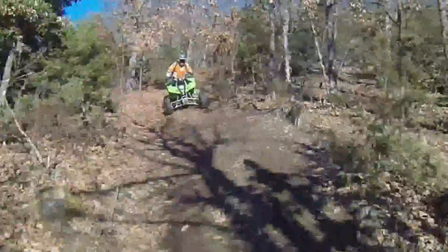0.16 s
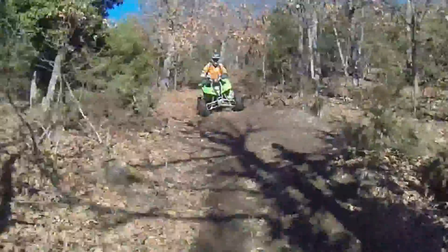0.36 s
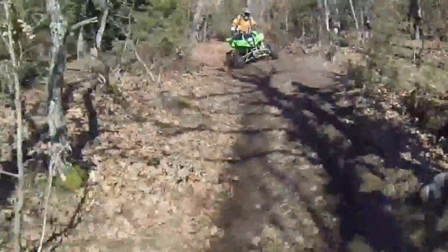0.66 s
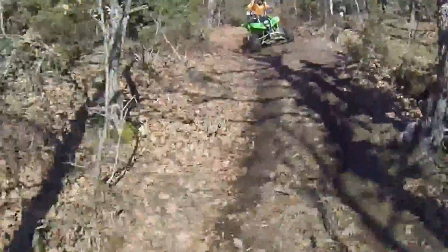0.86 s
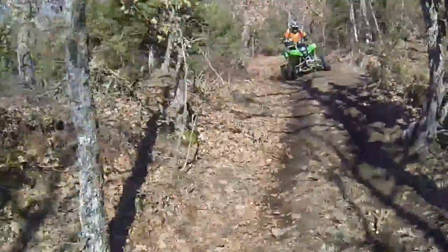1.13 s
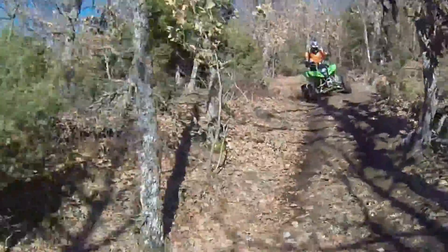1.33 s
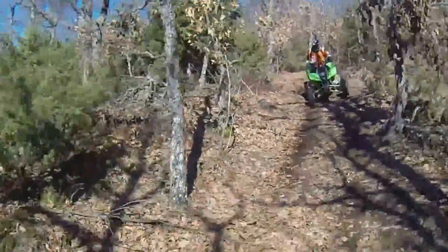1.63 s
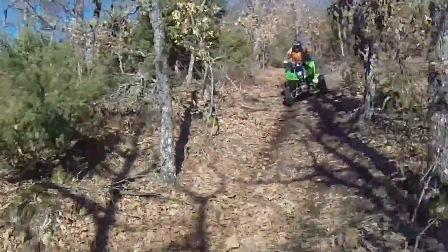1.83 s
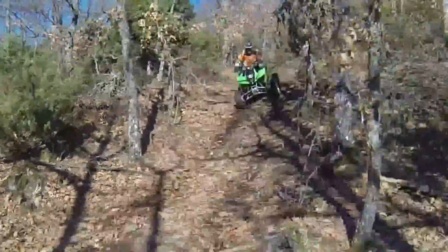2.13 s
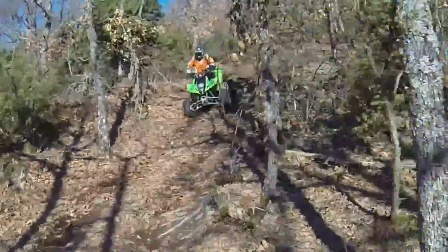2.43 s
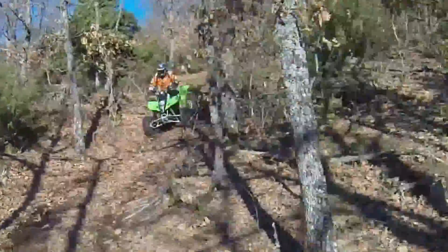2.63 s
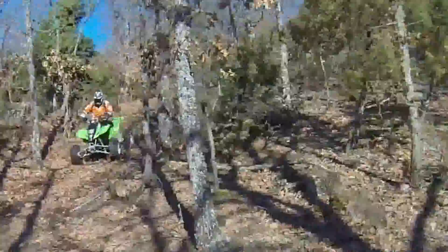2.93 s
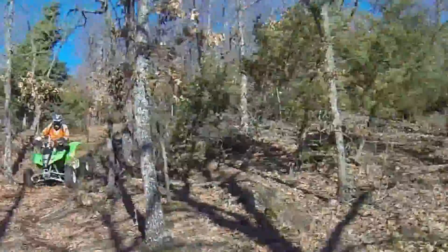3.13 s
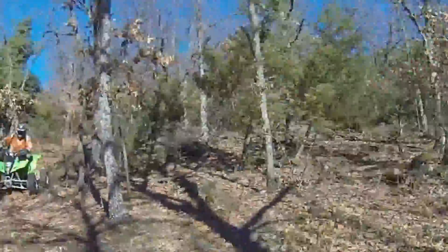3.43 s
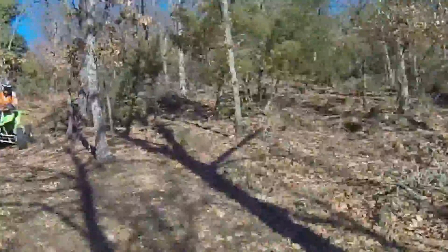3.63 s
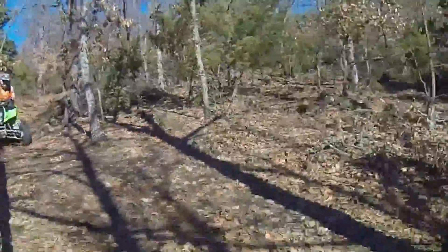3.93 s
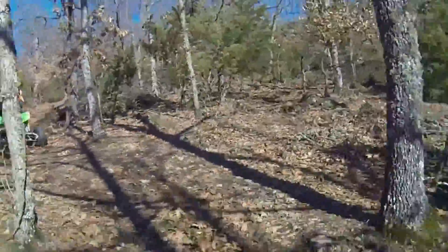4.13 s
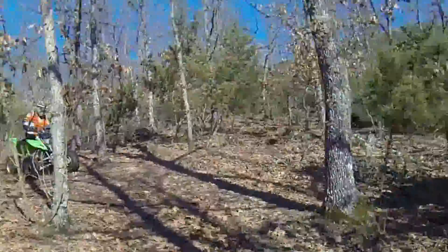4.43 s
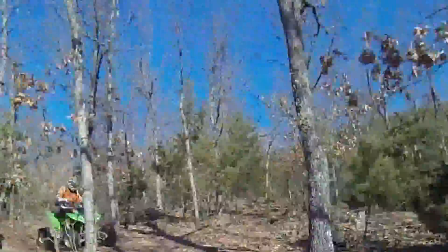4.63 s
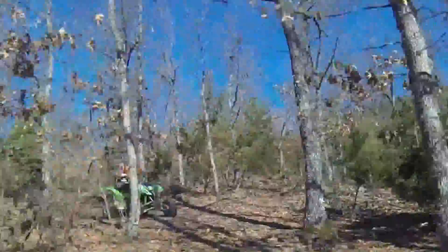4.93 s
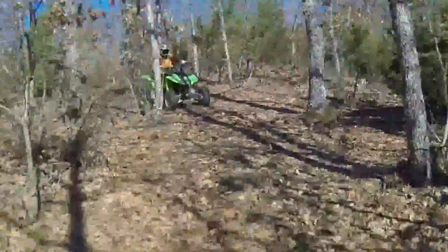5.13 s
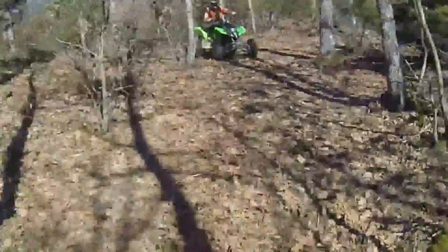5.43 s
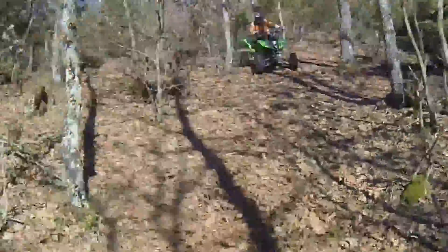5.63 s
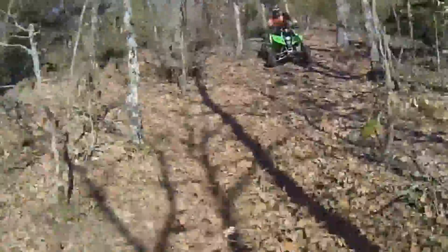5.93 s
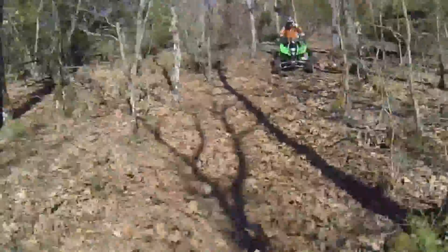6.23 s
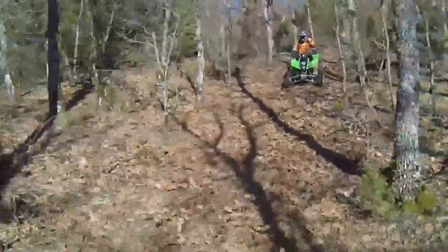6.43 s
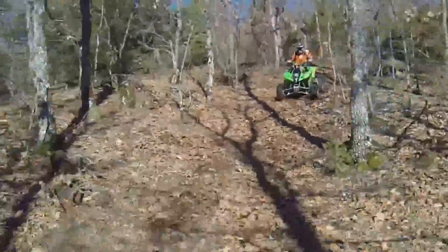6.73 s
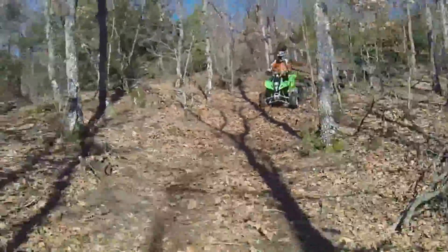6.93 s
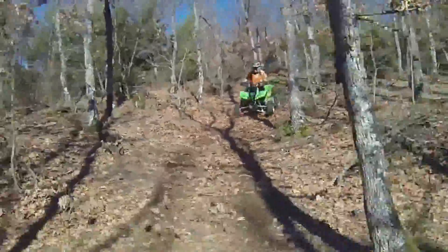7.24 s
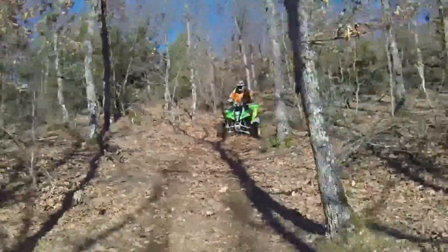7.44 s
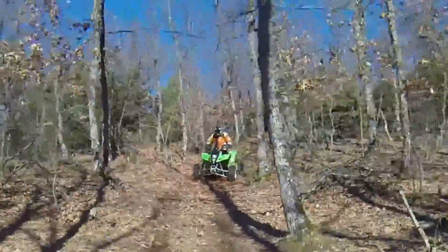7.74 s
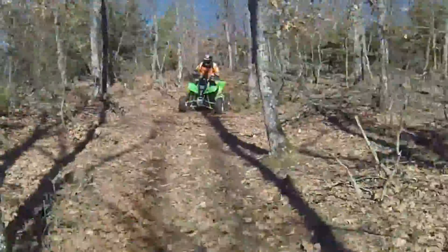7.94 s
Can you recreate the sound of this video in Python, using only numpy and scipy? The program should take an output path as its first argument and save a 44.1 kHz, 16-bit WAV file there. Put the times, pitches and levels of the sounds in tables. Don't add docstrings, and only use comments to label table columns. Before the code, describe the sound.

Close, muffled twin-cylinder quad bike thumping along a rough forest trail, leaves crackling under the tyres, twigs snapping, hard bumps and a burst of throttle.

```python
import sys
import numpy as np
from scipy import signal
from scipy.io import wavfile
from scipy.ndimage import uniform_filter1d

SR = 44100
rng = np.random.default_rng(int(sys.argv[2]) if len(sys.argv) > 2 else 0)


def wav_record(signal):
    frames = np.transpose(np.atleast_2d(signal))
    bounded = np.clip(frames, -1, 1)
    quanta = np.round(bounded * 32767).astype(np.int16)
    wavfile.write(sys.argv[1], SR, quanta)


def voltage_ratio(decibels):
    exponent = np.asarray(decibels, float) / 20
    return 10 ** exponent


N = 355881
TIME = np.arange(N) / SR

# start_s, peak_db, pitch_hz, t60_s,
# direction
JOLTS = [(0.291, -17, 35.6, 1, 1), (.585, -21, 34, 0.27, 0.36), (.668, 2, 29., .16, 1),
         (.702, -12, 37., .8, 1), (1.376, -11, 33.2, 0.55, 0.73), (3.187, -13.5, 38, 0.5, -0.41),
         (3.352, -19, 30.5, 1, 0.65), (4.086, -16.5, 37, 0.37, 0.81), (4.487, -21, 37, 0.46, -1.3),
         (5.31, -9.5, 36.3, 0.2, 0.91), (5.873, -15, 30.3, 0.28, 0.93), (5.928, -39, 35.8, 0.42, 0.5),
         (6.039, -7, 23.8, 0.23, 0.93), (7.245, -21, 29.8, 0.21, -0.61), (7.302, -20.5, 171, 0.087, 1),
         (7.43, -17.5, 21.8, 0.95, 0.81), (7.701, -11, 33.2, 0.77, 0.37), (8.038, 6.5, 29.5, 0.22, 0.83)]
HUM_DB, SWAY_DB, WANDER_DB = -52, -28, -6
SWING_DB, SWING_S = -16.5, 0.2
SWAY_TOP_HZ = 60
OPENING_SWING, OPENING_S = -.1, .004

DEAD_HZ, DEAD_WIDTH_HZ, DEAD_SHARE = 50.5, 24, 0.52

# pitch_hz, width_hz, level_db
HOUSING_MODES = [(560, 620, -13.5), (687, 365, -8.5), (1043, 190, -4), (1340, 530, 0), (1500, 585, -4.5),
                 (2120, 530, -11), (2612, 370, -9.5), (3184, 324, -11), (3700, 1530, -21.5)]
# pitch_hz, width_hz, level_db
RUSTLE_MODES = [(5000, 1470, -3), (6600, 1430, -7.5), (7680, 1260, -10.5), (10001, 3500, -16),
                (13201, 1800, -21.6)]

# start_s, peak_db, pitch_hz
RATTLES = [(0.106, -33, 1437), (0.4565, -33, 3400), (0.9436, -28, 1340), (1.487, -23, 1420),
           (1.623, -26.5, 1386), (1.6584, -30, 1380), (2.6285, -30, 1350), (2.807, -28, 1293),
           (2.891, -25.5, 1300), (2.9318, -26.5, 1330), (3.4355, -27.5, 1010), (3.6425, -28.5, 1460),
           (3.731, -29, 1405), (4.048, -27, 1230), (4.144, -28.5, 1360), (4.1703, -23, 1170),
           (5.328, -24, 1210), (5.504, -26, 1448), (5.535, -21, 1390), (5.676, -23.5, 1420),
           (5.8828, -5, 1326), (5.9104, -2, 1413), (5.936, -10, 1330), (6.2915, -26, 1340),
           (6.3146, -22, 1340), (6.9835, -30, 1000), (7.0558, -33, 1240), (7.398, -21, 1340),
           (7.4896, -30, 2600), (7.5713, -23, 1340)]
# start_s, peak_db, pitch_hz
CHATTER = [(0.019, -27, 1310), (0.1636, -27, 1340), (0.2287, -25, 1290), (0.5036, -28, 1440),
           (0.6572, -29, 1110), (2.5799, -29.5, 1054), (2.602, -27, 1440), (2.9805, -29, 1330),
           (3.0724, -32, 1530), (4.5694, -23, 1480), (5.2888, -31, 1390), (5.3777, -30, 1220),
           (5.4778, -24, 1440), (5.6271, -31, 1380), (5.8475, -28, 1340), (5.9967, -22, 1300),
           (6.059, -23, 1290), (6.2259, -27, 1264), (6.5096, -32, 1390), (6.554, -26.5, 1520),
           (6.6999, -24, 1325)]
# start_s, peak_db
TICKS = [(0.1171, -42), (0.222, -43), (0.4555, -45), (0.5068, -56.1), (0.5433, -46), (0.6834, -41),
         (0.8775, -49.1), (0.9444, -43.1), (1.5979, -49), (1.7041, -53.1), (4.6479, -56.1), (4.7502, -49),
         (5.7415, -57), (5.881, -23.5), (5.91, -26), (5.937, -32), (6.4304, -42), (6.6898, -52.1),
         (6.7227, -46), (6.9871, -44), (7.0634, -43.1), (7.1358, -53), (7.3278, -44), (7.5751, -42),
         (7.6312, -46.1)]
# start_s, peak_db, pitch_hz
SNAPS = [(0.0209, -32, 2170), (0.2209, -31, 2610), (1.6087, -35, 2500), (2.6439, -31.5, 2270),
         (3.3303, -32, 2100), (3.4351, -39, 2100), (3.676, -36, 2160), (3.701, -34, 2000),
         (4.9826, -39, 2170), (5.3253, -29, 2040), (5.4445, -32, 2050), (5.6735, -31, 2670),
         (5.8521, -31, 1900), (5.8815, -11, 2500), (5.9105, -11, 2100), (6.4313, -31, 2050),
         (6.571, -32, 2050), (6.987, -36, 2140), (7.0569, -38, 2310), (7.1362, -40, 2150),
         (7.4889, -30, 1980), (7.9054, -32, 2030)]
# start_s, peak_db, pitch_hz, t60_s
PING = (7.135, -49.5, 6420., .16)
CRACK_DB = -32
KNOCK_T60_S, BOUNCE_S, BOUNCE_DB = .024, .008, -10
KNOCK_HZ = 1400
SNAP_DB, SNAP_S, SNAP_WIDTH_HZ = -1, 0.0028, 520

# start_s, level_db
LITTER = [(0., 7.5), (.25, 1.5), (.6, 5), (1.08, 4.5), (1.4, 0.2), (2.36, -1.5), (2.8, 1), (3.39, 1.5),
          (3.75, -2.5), (4.3, 1.7), (4.95, 10), (5.8, 14), (6.09, 10), (6.81, 2), (7.42, 3), (7.75, 7),
          (8.07, 3.5)]
# start_s, level_db, length_s, groan_hz
SCUFFS = [(0.663, -43.5, 0.047, 840), (2.632, -43, 0.036, 1000), (2.834, -61, 0.28, 675),
          (5.057, -44, 0.038, 1500), (5.312, -39.5, 0.038, 1200), (5.256, -60, 0.057, 820),
          (6.443, -70, 0.35, 685), (6.57, -40, 0.022, 805), (3.428, -44, 0.032, 970),
          (3.66, -52, 0.038, 890), (5.889, -35, 0.019, 2600), (5.908, -35, 0.036, 2400),
          (5.935, -46, 0.039, 2830), (6.981, -42, 0.024, 950), (7.055, -48, 0.03, 820),
          (7.117, -48.5, 0.04, 824), (0.07, -48, 0.079, 1600), (.155, -46, 0.064, 1500)]
BRIGHT_DB = -61.5
CRUSH_DB, CRUSH_DB_PER_REV, CRUSH_LITTER_SHARE, CRUSH_LOAD_SHARE = -42, 0.205, 0.28, 0.029

# start_s, crank_turns_per_s
REVS = [(0.0, 36.03), (0.86, 23.24), (1.08, 27.83), (2.66, 24.76), (2.78, 25.53), (2.88, 22.46),
        (3.22, 24.71), (3.72, 19.48), (4.34, 25.02), (5.44, 28.36), (5.51, 34.57), (5.78, 24.96),
        (5.97, 38.91), (6.06, 29.86), (6.42, 33.0), (6.92, 24.52), (7.52, 20.31), (8.07, 21.08)]
START_TURNS = .56
CRUISE_REVS, CRUISE_LOAD_DB = 26, -23
# start_s, load_db, first_cylinder_lead_db, even_turn_lope_db
THROTTLE = [(0.0, -25.0, -6.0, -1.0), (0.3, -23.0, -1.5, 0.5), (0.6, -23.0, -0.5, 6.0),
            (0.95, -26.5, -2.5, -1.0), (1.26, -25.0, -1.5, 1.0), (1.62, -25.0, -1.0, 4.0),
            (1.9, -27.0, -1.0, 3.0), (2.25, -26.0, -1.0, -2.0), (2.6, -25.0, 1.5, -3.5),
            (3.0, -23.0, 1.5, -0.5), (3.4, -24.5, -2.0, -0.5), (3.8, -25.0, 0.5, -0.0),
            (4.4, -29.0, -2.0, 2.5), (5.2, -24.5, -1.5, 1.5), (6.15, -23.5, -1.5, -1.0),
            (6.9, -27.0, -2.0, -0.5), (7.35, -24.0, 1.0, -0.0), (8.07, -20.5, 0.0, -0.5)]
# start_s, extra_load_db, half_length_s
BLIPS = [
    (0.907, 4, 0.11),
    (2.88, 2, 0.23),
    (3.266, -7.5, 0.046),
    (3.721, 6.5, 0.033),
    (4.2, 2.5, 0.092),
    (5.509, 8.5, 0.16),
    (5.918, 12, 0.084),
    (6.404, 2.5, 0.36),
    (7.297, -1, 0.032),
]
SECOND_LOPE, LOPE_WANDER_DB = -0.7, .6
STEADY_LOAD_DB, LOOSE_LOAD_DB = -17, -25
# start_s, first_cylinder_db, second_cylinder_db
ODD_TURNS = [(0.068, 0.0, -6.0), (0.155, 7.0, -1.0), (0.373, -2.0, -6.0), (0.474, 1.0, 5.0),
             (0.509, -7.0, -6.0), (0.733, 2.0, 3.0), (0.815, -6.0, -6.0), (0.857, 4.0, 2.0),
             (0.98, -1.0, -11.0), (1.018, 2.0, -7.0), (1.055, 1.0, 5.0), (1.163, -1.0, 4.0),
             (1.199, 3.0, -6.0), (1.235, -8.0, 2.0), (1.307, 4.0, -1.0), (1.684, -6.0, -5.0),
             (1.721, 2.0, -10.0), (1.759, -5.0, 9.0), (1.796, 7.0, -8.0), (1.834, -8.0, 7.0),
             (1.944, 1.0, 4.0), (1.981, 5.0, 0.0), (2.249, 4.0, 0.0), (2.53, -4.0, 4.0), (2.77, -2.0, -7.0),
             (3.026, -13.0, -5.0), (3.233, 1.0, 4.0), (3.402, 4.0, 3.0), (3.684, 4.0, 1.0),
             (3.93, 3.0, 4.0), (4.022, -8.0, -8.0), (4.066, -1.0, -9.0), (4.11, 2.0, 5.0),
             (4.595, 7.0, 4.0), (4.9, -7.0, 0.0), (4.937, 0.0, 4.0), (4.974, 4.0, 0.0), (5.048, -8.0, 3.0),
             (5.266, -3.0, 6.0), (5.338, -10.0, -1.0), (5.537, 3.0, 3.0), (5.776, -9.0, -5.0),
             (5.814, 1.0, -13.0), (5.849, 6.0, -5.0), (6.246, -6.0, -5.0), (6.278, -9.0, -1.0),
             (6.659, -2.0, 4.0), (6.694, 2.0, 5.0), (6.73, 5.0, 0.0), (6.766, 2.0, 4.0), (6.804, 8.0, -4.0),
             (7.004, 7.0, 2.0), (7.046, -8.0, -1.0), (7.089, 6.0, 3.0), (7.132, -8.0, -2.0),
             (7.265, -10.0, -2.0), (7.356, -10.0, -4.0), (7.451, 4.0, 2.0), (7.5, -6.0, -3.0),
             (7.841, 3.0, -1.0)]
# start_s, delay_s, half_length_s
RUTS = [
    (.06, .0025, .1),
    (1.35, -.001, .25),
    (1.73, .005, .2),
    (2.15, -.004, .19),
    (5.89, .002, .04),
]

# period_ms, lean_ms, width_ms, can_share_db
THUMPS = [
    (4.5, .9, 1.6, 0),
    (5.3, .1, 2.2, -5),
]
# pitch_hz, width_hz, level_db
EXHAUST_MODES = [(173.3, 18.8, 0), (276, 30, -.5)]
# start_s, level_db, half_length_s
CAN_SWELLS = [(.2, 0.5, 0.086), (0.76, 5.5, 0.15), (1.264, -4, 0.14), (2.318, -2.5, .1), (3.98, 2.5, 0.075),
              (4.57, 2, .1), (5.464, 4.5, 0.098), (5.88, 4.5, 0.12), (6.2, 0, .15), (7.05, 3, 0.24),
              (7.746, -5.5, 0.17)]
CAN_SCATTER_DB = 1.2

# crank_multiple, level_db, db_per_extra_rev, lag_cycles, extra_lag_per_rev
INERTIA = [(2, -35.5, .85, .28, .018), (3, -36, -.15, .65, .012), (4, -36, 0, .9, -.008)]
# pitch_hz, half_width_hz, level_db
FRAME_MODES = [(66, 18.7, -3.5), (84, 16, -0.5), (131, 16, -2.5)]
# start_s, level_db
GRIP = [(0, 1), (.5, 0), (1.1, 0.5), (1.6, -1.5), (2.3, -0.5), (2.8, 0.5), (3.5, -1), (4.1, -0.5), (4.6, 0),
        (5.2, -2), (5.7, -2.5), (6.3, 2.5), (6.8, 2.5), (7.2, -2), (7.6, 0), (8.07, -0.5)]
SHAKE_WANDER_DB, FRAME_FLOOR = 1.5, .12


def unit(x):
    return x / np.sqrt(np.mean(x ** 2))


def curves(table):
    s, *columns = np.transpose(table)
    return [np.interp(TIME, s, c) for c in columns]


def hump(t, s, half):
    return np.clip(2 - 2 * abs(t - s) / half, 0, 1)


def walk(rate):
    k = int(SR / rate)
    held = np.repeat(rng.standard_normal(N // k + 1), k)
    return 1.96 * uniform_filter1d(uniform_filter1d(held, k), k)[:N]


def add(out, s, sound):
    i = int(s * SR)
    out[i:i + len(sound)] += sound[:N - i]


def band(x, hz, width):
    return signal.lfilter(*signal.iirpeak(hz, hz / width, SR), x)


def band_twice(x, hz, width):
    return band(band(x, hz, width), hz, width)


def body(x, modes):
    return sum((-1) ** k * voltage_ratio(db) * band_twice(x, hz, width) for k, (hz, width, db) in enumerate(modes))


def ring(hz, t60, rise):
    t = np.arange(int(t60 * SR)) / SR
    return np.sin(2 * np.pi * hz * t) * np.exp(-np.log(1000) * t / t60) * (1 - np.exp(-t / rise))


def mount():
    hum = unit(band_twice(rng.standard_normal(N), 37.5, 9.))
    sway = unit(band_twice(rng.standard_normal(N), 13.0, 43.0))
    sway = signal.sosfilt(signal.butter(2, SWAY_TOP_HZ, fs=SR, output="sos"), sway)
    swing = sum(voltage_ratio(min(db, -12) + SWING_DB) * np.exp(-abs(TIME - s) / SWING_S) for s, db, *_ in JOLTS)
    out = voltage_ratio(HUM_DB + WANDER_DB * walk(2.79)) * hum + (voltage_ratio(SWAY_DB) + swing) * sway
    for s, db, hz, t60, direction in JOLTS:
        add(out, s, direction * voltage_ratio(db + 2.5) * ring(hz, t60, .008))
    return out + OPENING_SWING * np.exp(-TIME / OPENING_S)


def rattles():
    knocks, cracks, rings = np.zeros((3, N))
    t = np.arange(4000) / SR
    scrape = np.exp(-t / 0.0064) + voltage_ratio(-12.0) * np.exp(-t / 0.017)
    for s, db, hz in RATTLES + [(s, db - 4, hz) for s, db, hz in CHATTER]:
        noise = rng.standard_normal((2, 4000)) * scrape
        knock = ring(hz, KNOCK_T60_S * min(1, KNOCK_HZ / hz) ** 2, 0.00094)
        bounce_db = BOUNCE_DB * max(1, hz / KNOCK_HZ)
        for k in range(3):
            add(rings, s - .0012 + k * BOUNCE_S, voltage_ratio(db + 3.5 + k * bounce_db) * knock)
        add(knocks, s - .0007, voltage_ratio(db + 0.5) * noise[0])
        add(cracks, s - .0007, voltage_ratio(db + CRACK_DB) * noise[1])
    for s, db in TICKS:
        add(cracks, s, voltage_ratio(db + 4.5) * rng.standard_normal(4000) * np.exp(-t / 0.0064))
    for s, db, hz in SNAPS:
        snap = rng.standard_normal(4000) * np.exp(-t / SNAP_S)
        snap = body(snap, [(hz, SNAP_WIDTH_HZ, 0)])
        add(rings, s - .001, voltage_ratio(db + SNAP_DB) * snap / abs(snap).max())
    start, db, hz, t60 = PING
    add(rings, start, voltage_ratio(db) * ring(hz, t60, 0.0012))
    return rings + body(knocks, HOUSING_MODES) + body(cracks, RUSTLE_MODES)


def crackle(modes, flicker_db):
    sizes = voltage_ratio(1.46 * rng.exponential(size=N))
    return unit(sum(voltage_ratio(flicker_db * walk(15)) * body(sizes * rng.standard_normal(N), [m]) for m in modes))


def branches():
    drag, groan = np.zeros((2, N))
    for s, db, length, hz in SCUFFS:
        stroke = voltage_ratio(db) * np.hanning(int(length * SR))
        add(drag, s, stroke)
        add(groan, s, stroke * unit(body(rng.standard_normal(len(stroke)), [(hz, 0.34 * hz, 0)])))
    return drag, groan


def leaves(beats, load_db):
    faster, litter_db = curves(REVS)[0] - CRUISE_REVS, curves(LITTER)[0]
    extra_load_db = load_db - CRUISE_LOAD_DB
    crush_db = CRUSH_DB + CRUSH_DB_PER_REV * faster + CRUSH_LITTER_SHARE * litter_db
    crush_db += CRUSH_LOAD_SHARE * extra_load_db
    buzz_depth = (0.21 + 0.0082 * faster + 0.016 * extra_load_db).clip(0, .5)
    buzz = 1 + buzz_depth * unit(signal.lfilter([1], [1, -.996], np.sqrt(beats)))
    swell = 0.5 * walk(9.8)
    drag, groan = branches()
    crush = (voltage_ratio(crush_db + swell - 1.0) * buzz + voltage_ratio(3.5) * drag) * crackle(HOUSING_MODES, 1.0)
    rustle = (voltage_ratio(BRIGHT_DB + litter_db + swell - 5.0) + voltage_ratio(-51) * drag) * crackle(RUSTLE_MODES, 0.85)
    return crush + rustle + groan


def pistons(turns, revs):
    faster, out = revs - CRUISE_REVS, 0
    for k, db, db_per_rev, lag, lag_per_rev in INERTIA:
        modes = sum(voltage_ratio(d) / (1 + ((k * revs - hz) / width) ** 2) for hz, width, d in FRAME_MODES)
        db = db + db_per_rev * faster + SHAKE_WANDER_DB * walk(6)
        shake = np.cos(2 * np.pi * (k * turns - lag - lag_per_rev * faster))
        out = out + (FRAME_FLOOR + modes) * voltage_ratio(db) * shake
    return voltage_ratio(curves(GRIP)[0]) * out


def crank():
    load, lead, lope = curves(THROTTLE)
    load = load + sum(db * hump(TIME, s, half) for s, db, half in BLIPS)
    lope = lope + LOPE_WANDER_DB * walk(5.1)
    turns = START_TURNS + np.cumsum(curves(REVS)[0]) / SR
    return turns, (load + lead, load - lead), (lope, SECOND_LOPE * lope)


def firing(n, turns, revs, loads, lopes, chance):
    odd_db = np.zeros((2, len(n)))
    for when, *db in ODD_TURNS:
        odd_db[:, np.argmin(abs(np.interp(n, turns, TIME) - when))] = db
    gap = 1 / 4 - np.clip((np.interp(n, turns, revs) - 28) / 120, 0, .035)
    fired = np.zeros((2, N))
    for k in range(2):
        at = np.interp(n + k * gap, turns, TIME) + chance[k]
        at = at - .001 + sum(delay * hump(at, when, half) for when, delay, half in RUTS)
        db = np.interp(at, TIME, loads[k]) + np.interp(at, TIME, lopes[k]) * (-1) ** n
        fired[k][(at * SR).astype(int)] = voltage_ratio(db + chance[2 + k] + odd_db[k])
    return fired


def exhaust_thumps(fired):
    ms = np.arange(-400, 401) / SR * 1000
    window = np.hanning(len(ms))
    out = 0
    for impulses, (period, lean, width, _) in zip(fired, THUMPS):
        shape = np.cos(2 * np.pi * ms / period) * np.exp(-((ms + lean) / width) ** 2 / 2)
        out = out + signal.fftconvolve(impulses, shape - 2 * shape.mean() * window, "same")
    return out


def silencer_can(fired):
    blown = sum(voltage_ratio(can_db) * impulses for impulses, (*_, can_db) in zip(fired, THUMPS))
    loose_db = sum(db * hump(TIME, s, half) for s, db, half in CAN_SWELLS)
    struck = blown * voltage_ratio(CAN_SCATTER_DB * walk(19) + loose_db)
    return voltage_ratio(35.5) * band(band_twice(struck, 420.0, 99.0), 387.0, 160.0)


def exhaust(fired, revs, load_db):
    thumps = exhaust_thumps(fired)
    pipe = voltage_ratio(-1.5) * (thumps + sum(voltage_ratio(db) * band(thumps, hz, width) for hz, width, db in EXHAUST_MODES))
    cancel = np.clip((revs - 27) / 8, 0, .5) * np.clip((-12 - load_db) / 5, 0, 1)
    pipe -= cancel * band(pipe, 271.0, 68.0)
    flutter = unit(band_twice(rng.standard_normal(N), 200., 250.))
    pipe += flutter * voltage_ratio(load_db - 30)
    can = silencer_can(fired)
    pipe = pipe - voltage_ratio(-1.5) * (can + voltage_ratio(-3) * band(can, 436., 26.))
    return pipe - .9 * band(pipe, 474., 24.)


def engine():
    turns, loads, lopes = crank()
    revs = np.gradient(turns, TIME)
    n = np.arange(np.ceil(turns[0]), turns[-1] - 1 / 4)
    chance = rng.standard_normal((len(n), 5)).T * [[.0003], [.0005], [.9], [.9], [1.]]
    mean_load_db = np.interp(n, turns, loads[0] + loads[1]) / 2
    chance = chance * np.interp(mean_load_db, [LOOSE_LOAD_DB, STEADY_LOAD_DB], [1.2, .35])
    fired = firing(n, turns, revs, loads, lopes, chance)
    shake = voltage_ratio(np.interp(turns, n, chance[4])) * pistons(turns, revs)
    return exhaust(fired, revs, loads[1]) + shake, sum(fired), loads[0]


def scene():
    motor, beats, load_db = engine()
    frame = motor + mount()
    frame = frame - DEAD_SHARE * band(frame, DEAD_HZ, DEAD_WIDTH_HZ)
    return (frame + leaves(beats, load_db) + rattles())[None]


def roll_off(x):
    return signal.sosfilt(signal.butter(12, 15270, fs=SR, output="sos"), x)


def record(dry):
    mix = np.tanh(dry / 1.6).clip(-.62, .62) * 1.6
    return roll_off(mix)


dry = scene()
out = record(dry)
wav_record(out)
```